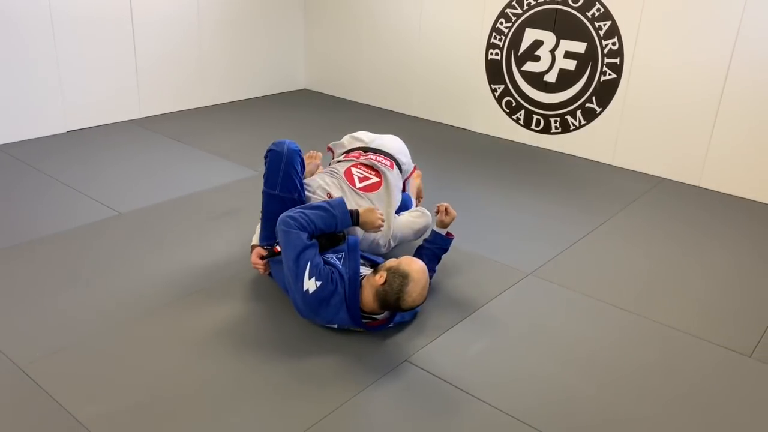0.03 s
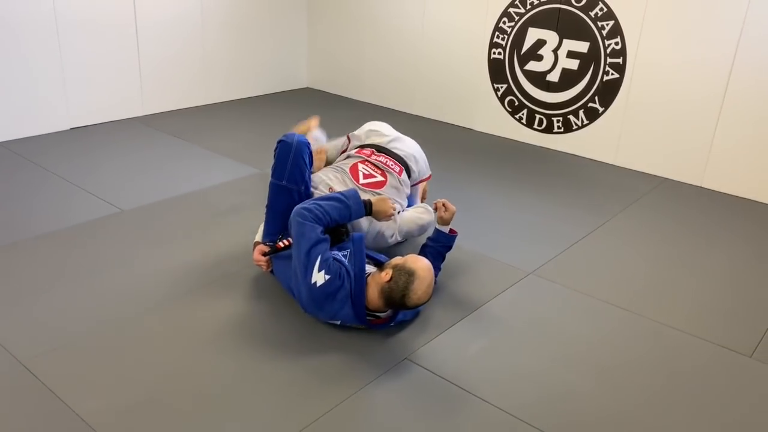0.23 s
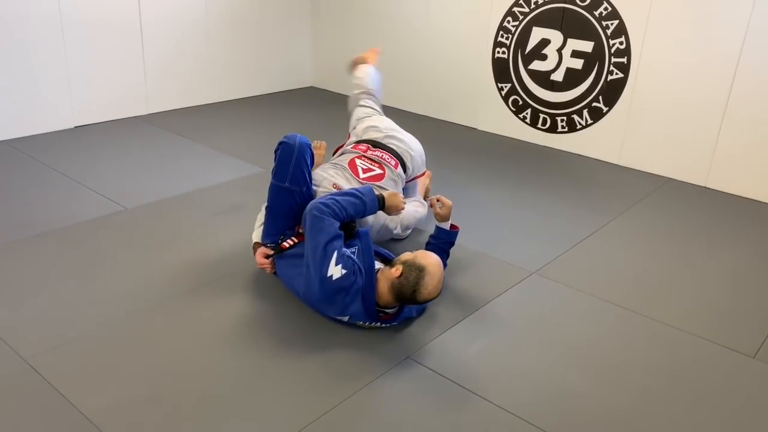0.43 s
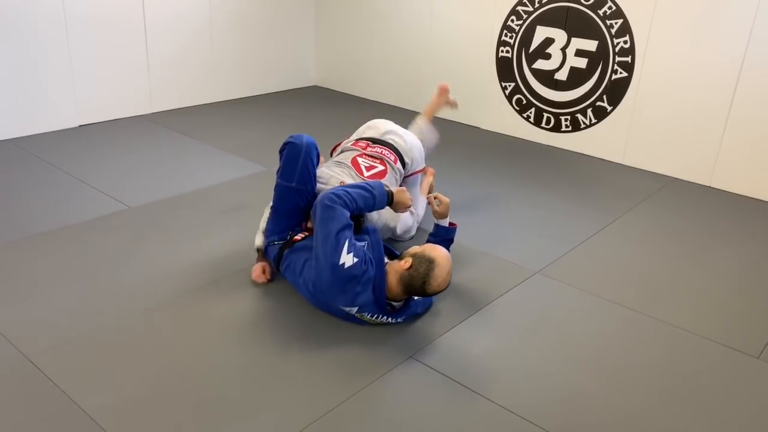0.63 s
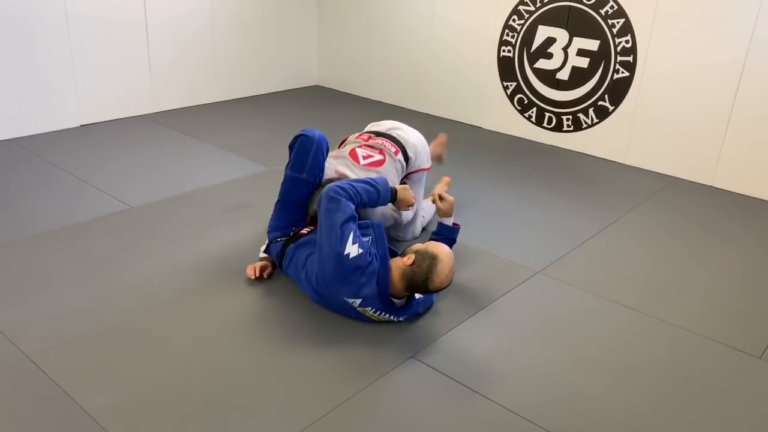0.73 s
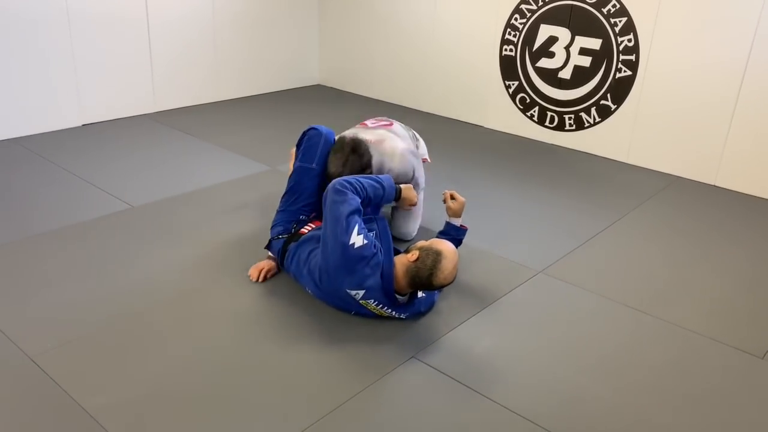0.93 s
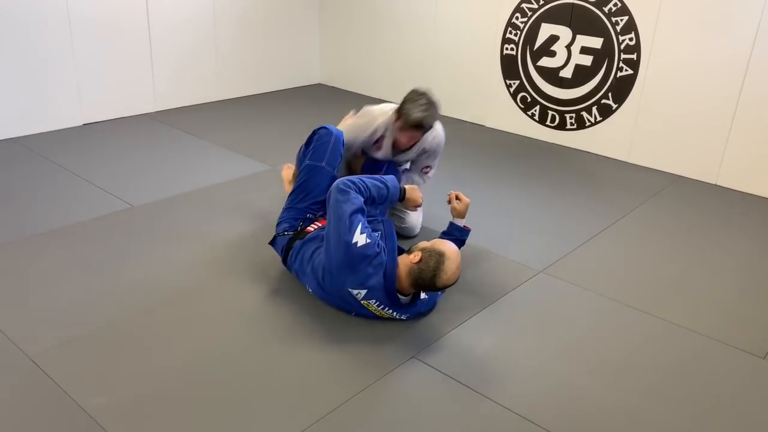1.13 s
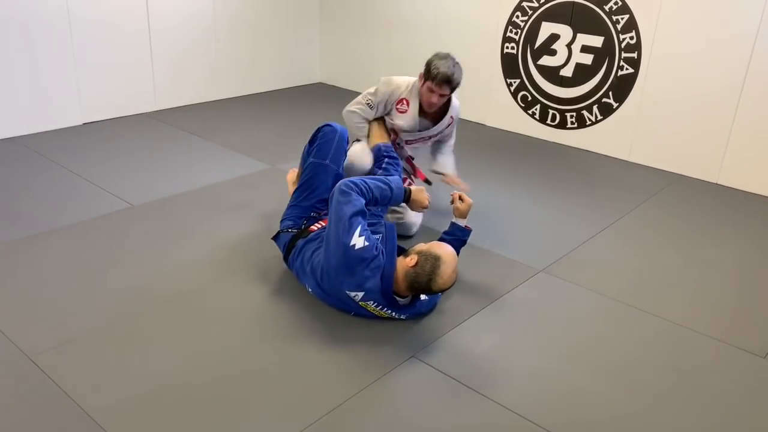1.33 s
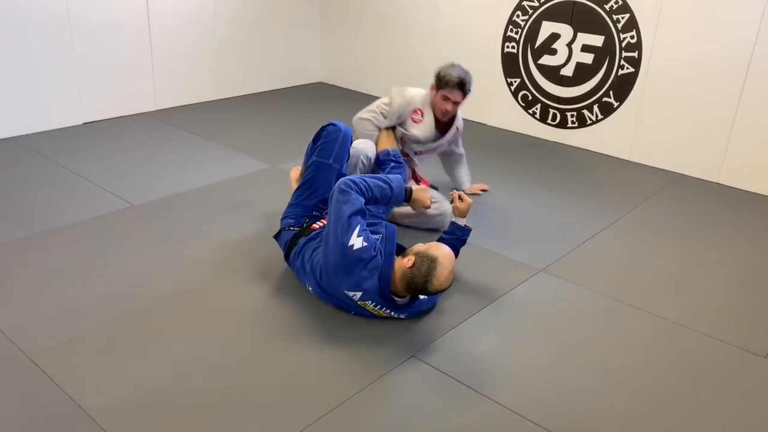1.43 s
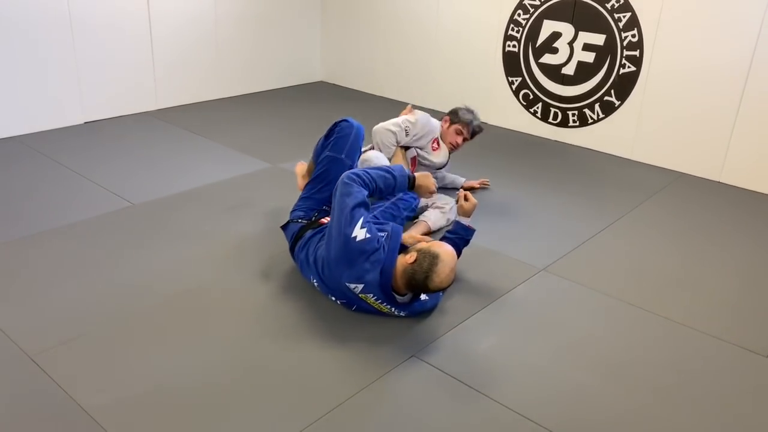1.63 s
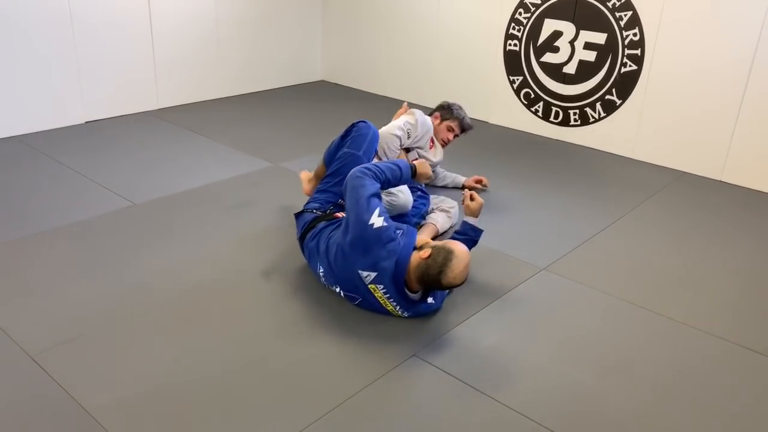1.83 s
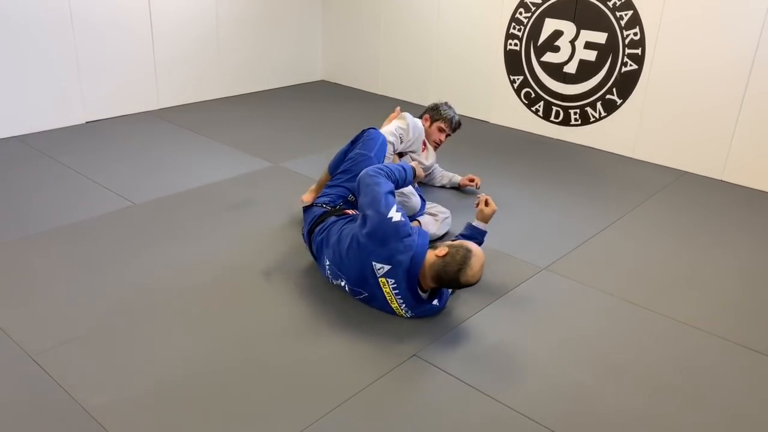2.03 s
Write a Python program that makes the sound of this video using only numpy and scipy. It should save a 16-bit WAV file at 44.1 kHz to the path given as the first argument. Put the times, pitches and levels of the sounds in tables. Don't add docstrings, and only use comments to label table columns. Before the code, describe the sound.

Body thuds on a padded floor with bright cloth swishes and a brief skin squeak

```python
import sys
import numpy as np
from scipy import signal
from scipy.fft import rfft, irfft, next_fast_len
from scipy.io import wavfile
from scipy.ndimage import uniform_filter1d

SR = 44100
rng = np.random.default_rng(int(sys.argv[2]) if len(sys.argv) > 2 else 0)


def generate_wav(signal):
    frames = np.transpose(np.atleast_2d(signal))
    scaled = np.clip(frames, -1, 1) * 32767
    pcm = np.round(scaled).astype(np.int16)
    wavfile.write(sys.argv[1], SR, pcm)


def linear_from_db(decibels):
    return 10 ** (np.asarray(decibels, float) / 20)


N = 92036
T = np.arange(N) / SR
SIZE = next_fast_len(N + SR // 2)
HZ = np.maximum(np.fft.rfftfreq(SIZE, 1 / SR), 1)

# pitch_hz, density_db (per Hz)
AIR_SPECTRUM = [(20, -4), (60, 1.5), (150, -6.5), (300, -20), (600, -29.5), (2000, -32.5), (6000, -48.5),
                (15700, -49)]
# time_s, level_db
FLOOR_SWAY = [(0, -56), (.6, -55), (.8, -42), (1.0, -40), (1.12, -35), (1.3, -35), (1.42, -40), (1.55, -35),
              (1.75, -35), (1.95, -44), (2.09, -44)]
# peak_s, rise_s, fall_s, level_db, centre_hz
COTTON_RUBS = [(.02, 0.08, 0.055, -62, 1440), (.30, 0.055, 0.26, -60.5, 2640),
               (.63, 0.025, 0.029, -48, 354), (.55, 0.038, 0.13, -46.5, 960),
               (.75, 0.052, 0.05, -44.5, 874), (.955, 0.042, 0.054, -41, 1330),
               (.95, 0.022, .04, -39.5, 2130), (.84, 0.05, 0.095, -47.5, 323),
               (1.04, 0.017, 0.11, -42, 370), (1.125, 0.058, 0.076, -37.5, 790),
               (1.23, 0.012, 0.038, -39, 810), (1.295, 0.016, 0.068, -36, 710),
               (1.45, 0.02, 0.046, -44, 318), (1.545, 0.043, 0.058, -32.5, 700),
               (1.545, 0.027, 0.04, -35.5, 2070), (1.73, 0.049, 0.11, -41, 810),
               (1.66, 0.12, 0.04, -44, 248), (1.79, 0.13, 0.065, -43.5, 197),
               (1.94, 0.023, 0.022, -46.5, 248), (1.99, 0.054, 0.13, -40.5, 457),
               (2.0, 0.084, 0.017, -54, 2300), (2.07, 0.071, 0.065, -38.5, 515)]
# peak_s, rise_s, fall_s, level_db, whistle_hz
VINYL_SWISHES = [(.25, 0.029, 0.11, -60.5, 2730), (.36, 0.017, 0.02, -61, 4200),
                 (.55, 0.03, 0.29, -67, 1200), (.71, 0.04, 0.066, -53, 6200),
                 (.740, 0.006, 0.053, -47.5, 7500), (.92, 0.013, 0.04, -44, 4300),
                 (.965, 0.028, 0.06, -31, 4550), (1.05, 0.051, 0.1, -45, 5100),
                 (1.14, 0.028, 0.069, -32.5, 2400), (1.215, 0.054, 0.065, -34.5, 12600),
                 (1.395, 0.039, .025, -31.5, 13500), (1.400, 0.019, 0.033, -29.5, 8100),
                 (1.45, 0.066, 0.11, -34.5, 8300), (1.545, 0.025, 0.063, -31.5, 4160),
                 (1.66, 0.25, 0.044, -42, 8700), (1.78, 0.088, 0.027, -48.5, 2720),
                 (1.88, 0.036, .05, -67.5, 2000), (1.95, 0.082, 0.04, -63, 7060),
                 (2.07, 0.051, .1, -76, 7600)]
# pitch_hz, gain_db
SWISH_SPECTRUM = [(300, 1.5), (1500, -7.5), (3000, 0), (6000, -2.5), (8300, -3), (10500, 5), (13000, -4),
                  (16000, -9.5)]
# peak_s, rise_s, fall_s, level_db, pitch_hz
SKIN_SQUEAKS = [
    (.922, .008, .012, -45, 4350),
    (.968, .012, .015, -37.5, 4600),
    (.988, .008, .012, -42, 4400),
    (.950, .006, .01, -46, 5000),
    (.950, .015, .02, -48, 2050),
    (1.41, .015, .015, -48, 3700),
    (1.397, .006, .008, -34, 8350),
    (1.405, .015, .015, -44, 6900),
    (1.425, .01, .012, -44, 7600),
    (.265, .015, .04, -66, 2200),
]
# start_s, peak_db, pitch_hz, t60_s
FLOOR_BOOMS = [(.7605, -16.5, 88, .085), (.817, -28, 60, .08), (.893, -32, 54, .11), (.980, -27, 25, .05),
               (1.075, -27, 30, .08), (1.112, -27, 112, .12), (1.113, -23, 30, .07), (1.150, -23, 21, .11),
               (1.210, -19, 27, .11), (1.256, -23, 24, .2), (1.310, -32, 105, .06), (1.515, -28, 90, .05),
               (1.568, -12, 75.5, .16), (1.551, -18, 38.5, .24), (1.540, -19, 30, .08),
               (1.627, -21, 33, .06), (1.665, -18, 27, .14), (1.711, -28, 62, .1), (1.738, -23, 36, .12),
               (1.792, -21, 42, .08), (1.838, -24, 27, .2), (1.588, -25, 135, .09), (1.97, -33, 45, .15)]
# start_s, peak_db, pitch_hz, t60_s
SKIN_SLAPS = [(0.7358, -16.5, 326, 0.014), (0.7424, -26, 355, 0.048), (0.757, -26.5, 203, 0.022),
              (0.766, -31, 322, 0.013), (.778, -33.5, 410, 0.036), (0.799, -33.5, 247, 0.018),
              (0.7371, -36, 940, 0.013), (0.811, -34.5, 183, 0.053), (1.070, -35.5, 570, 0.023),
              (1.107, -25, 367, 0.028), (1.116, -23.5, 326, 0.028), (1.134, -36, 220, 0.028),
              (1.154, -32, 307, 0.052), (1.189, -30, 245, 0.019), (1.282, -28, 550, 0.058),
              (1.294, -29, 433, 0.1), (1.305, -30, 537, 0.059), (1.290, -28, 920, 0.017),
              (1.304, -35, 310, 0.021), (1.320, -25.5, 231, 0.025), (1.318, -35, 554, 0.026),
              (1.319, -36, 990, .02), (1.529, -24.5, 245.5, 0.073), (1.537, -17, 162, .05),
              (1.5456, -15, 180, 0.052), (1.548, -26, 284, 0.049), (1.539, -31.5, 1264, 0.027),
              (1.539, -17, 355, 0.011), (1.540, -30, 580, 0.034), (1.549, -28.5, 554, 0.054),
              (1.556, -27.5, 460, 0.046), (1.568, -25.5, 552, 0.031), (1.575, -27.5, 860, 0.013),
              (1.597, -28, 328, 0.051), (1.615, -28.5, 192, 0.034)]
# pitch_hz, lag_half_turns
PORT_LAG = [(0, 0), (1000, .06), (5500, 1), (7400, 2), (8400, 2.22), (10000, 2.94), (11300, 3.07),
            (13100, 3.95), (14400, 4.08), (16000, 4.95)]
# pitch_hz, ratio_db
ROOM_RATIO = [(40, -28), (120, -17), (300, -10), (700, -6), (1400, 6), (5500, 5), (7500, -6), (10500, -20)]


def level(x, db):
    return x * linear_from_db(db) / np.sqrt(np.mean(x ** 2))


def noise():
    return rng.standard_normal(N)


def shape(table):
    hz, db = np.array(table, float).T
    return linear_from_db(np.interp(np.log(HZ), np.log(hz), db))


def coloured(x, gain):
    return irfft(rfft(x, SIZE) * gain, SIZE)[..., :N]


def resonance(hz, q):
    return 1 / (1 + (q * (HZ / hz - hz / HZ)) ** 2)


def walk(rate):
    hold = max(int(SR / rate), 50)
    steps = rng.standard_normal(N // 50 + 1)[np.arange(N) // hold]
    return 1.2 * uniform_filter1d(steps, hold)


def air():
    drift = linear_from_db(1.2 * walk(6))
    return level(coloured(noise(), shape(AIR_SPECTRUM)) * drift, -47)


def sway():
    centre_hz, width_hz = 32, 40
    wobble = coloured(noise(), 1 / (1 + ((HZ - centre_hz) / width_hz) ** 2))
    s, db = np.array(FLOOR_SWAY).T
    return level(wobble, 0) * linear_from_db(np.interp(T, s, db))


def strokes(rows, colour):
    grain_db, grains_per_s = 1.64, 300
    snag_db, snags_per_s = 0.5, 40
    loss_per_db, loss_from_hz, firm_db = 0.16, 4300, -23.5
    out = np.zeros(N)
    for s, rise, fall, db, hz in rows:
        swell = np.exp(-.5 * ((T - s) / rise) ** 2)
        decay = np.exp(-np.abs(T - s) / fall)
        env = np.where(T < s, swell, decay)
        grit = noise() * linear_from_db(grain_db * walk(grains_per_s) + snag_db * walk(snags_per_s))
        octaves = np.log2(1 + HZ / loss_from_hz)
        dull = linear_from_db(loss_per_db * min(db - firm_db, 0) * octaves)
        out += env * level(coloured(grit, colour(hz) * dull), db)
    return out


def rub_colour(hz):
    return 1 / (1 + np.abs(np.log2(HZ / hz) / 1.68) ** 3)


def swish_colour(hz):
    whistle = linear_from_db(2) * resonance(hz, 5)
    undertone = linear_from_db(-5) * resonance(.46 * hz, 5)
    return shape(SWISH_SPECTRUM) * (1 + whistle + undertone)


def squeaks():
    wander, wanders_per_s, flutter_db = .02, 250, 4
    out = np.zeros(N)
    for s, rise, fall, db, hz in SKIN_SQUEAKS:
        env = np.exp(-.5 * ((T - s) / np.where(T < s, rise, fall)) ** 2)
        pitch = hz * (1 + wander * walk(wanders_per_s))
        tone = np.sin(2 * np.pi * np.cumsum(pitch) / SR)
        out += env * level(tone * linear_from_db(flutter_db * walk(wanders_per_s)), db)
    return out


def cloth():
    return strokes(COTTON_RUBS, rub_colour) + strokes(VINYL_SWISHES, swish_colour) + squeaks()


def ring(rows, rise_cycles, sag, fade):
    out = np.zeros(N)
    for s, db, hz, t60 in rows:
        t = np.maximum(T - s, 0)
        rise = (1 - np.exp(-t * hz / rise_cycles)) ** 2
        env = rise * np.exp(-np.log(1000) * (t / t60) ** fade)
        bend = 1 + sag * (.5 - np.minimum(t / t60, 1))
        out += linear_from_db(db) * env / env.max() * np.sin(2 * np.pi * hz * t * bend)
    return out


def booms():
    return ring(FLOOR_BOOMS, .32, 0, 1.9)


def slaps():
    skin = ring(SKIN_SLAPS, 0.39, .1, 1.17)
    scuff_colour = 1 / (1 + (HZ / 900) ** 2) * HZ / (HZ + 200)
    scuff = level(coloured(noise(), scuff_colour), -11)
    scuff = scuff * uniform_filter1d(np.abs(skin), int(0.013 * SR))
    tick_db, tick_s = -21.5, 0.0034
    tick_env = np.zeros(N)
    for s, db, _, _ in SKIN_SLAPS:
        tick_env += linear_from_db(db + tick_db) * (T > s) * np.exp(-np.abs(T - s) / tick_s)
    ticks = tick_env * level(coloured(noise(), 1 / (1 + (HZ / 7000) ** 2)), 0)
    return skin + scuff + ticks


def direct(x):
    hz, half_turns = np.array(PORT_LAG, float).T
    turn = np.exp(.5j * np.pi * np.interp(HZ, hz, half_turns))
    return coloured(x, np.array([turn.conj(), turn]))


def room(x):
    t60_s, delay_s, move_s = .16, .002, .12
    t = np.arange(SR // 2) / SR - delay_s
    decay = (t > 0) * np.exp(-np.log(1000) * t / t60_s)
    out = np.zeros((2, N))
    for s in np.arange(0, T[-1] + move_s, move_s):
        tails = rng.standard_normal((2, SR // 2)) * decay
        tails = tails / np.sqrt(np.sum(tails ** 2, axis=1, keepdims=True))
        moment = np.cos(np.pi / 2 * np.clip((T - s) / move_s, -1, 1))
        out += coloured(x * moment, rfft(tails, SIZE))
    return out


def scene():
    x = air() + sway() + cloth() + booms() + slaps()
    wet = shape(ROOM_RATIO)
    share = 1 / np.sqrt(1 + wet ** 2)
    return coloured(direct(x), share) + coloured(room(x), wet * share)


def top_cut(x):
    return signal.sosfilt(signal.butter(12, 15840, fs=SR, output="sos"), x)


def record(dry):
    mix = coloured(dry, 1 / (1 + (HZ / 15850) ** 120))
    return top_cut(mix)


dry = scene()
out = record(dry)
generate_wav(out)
```